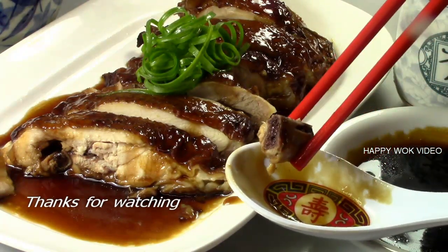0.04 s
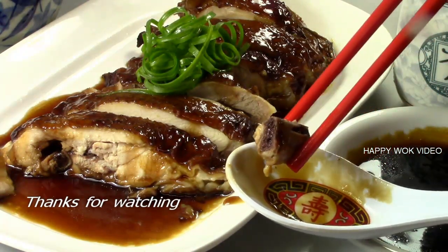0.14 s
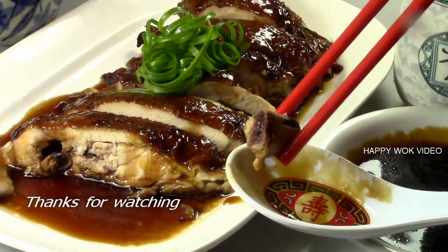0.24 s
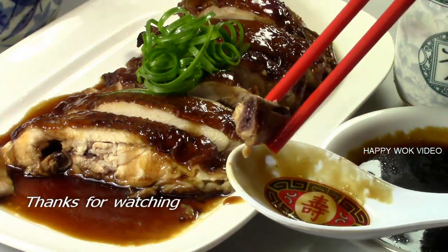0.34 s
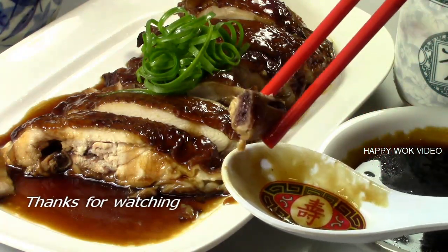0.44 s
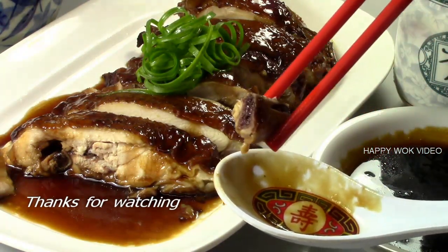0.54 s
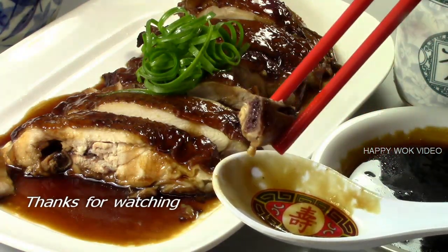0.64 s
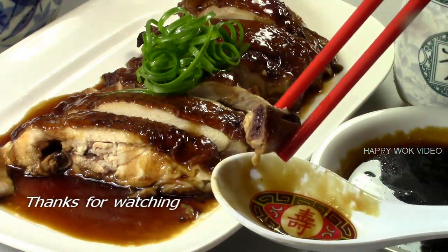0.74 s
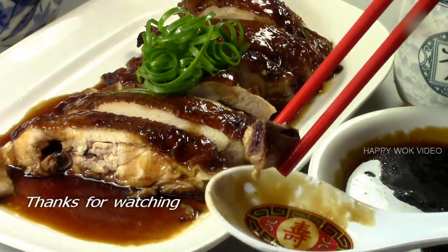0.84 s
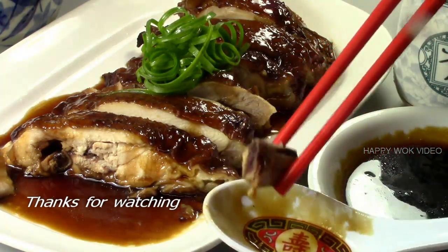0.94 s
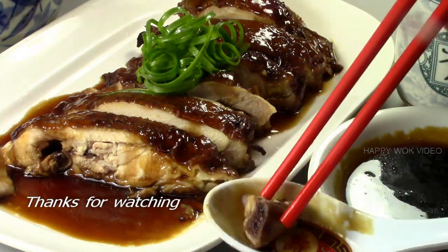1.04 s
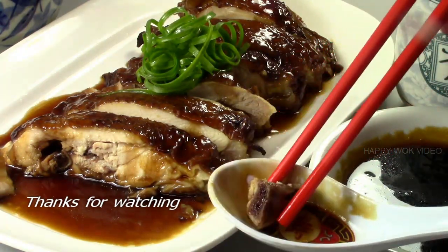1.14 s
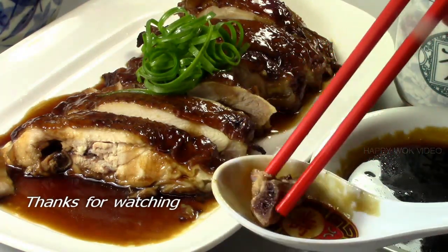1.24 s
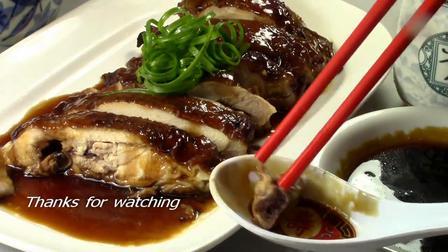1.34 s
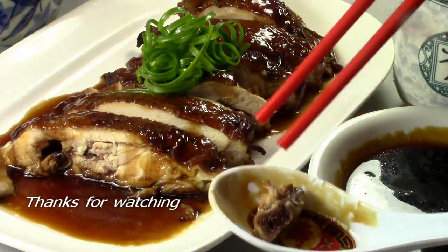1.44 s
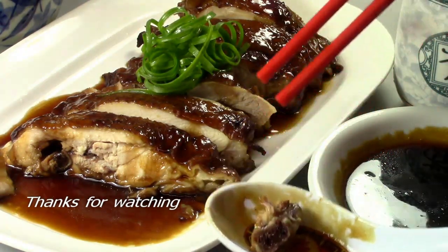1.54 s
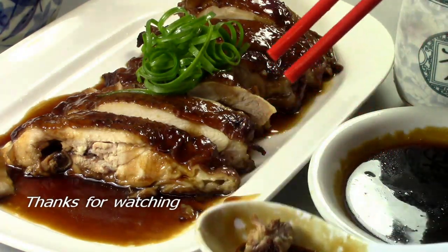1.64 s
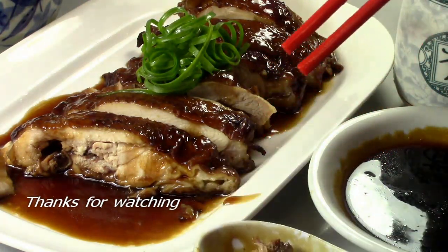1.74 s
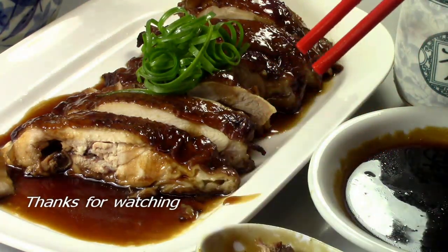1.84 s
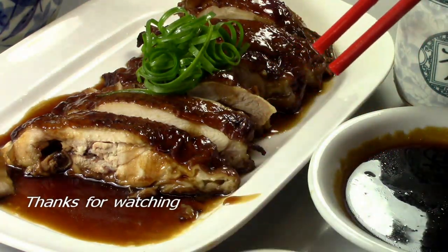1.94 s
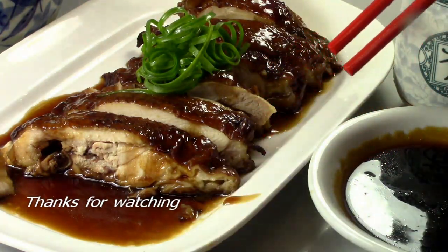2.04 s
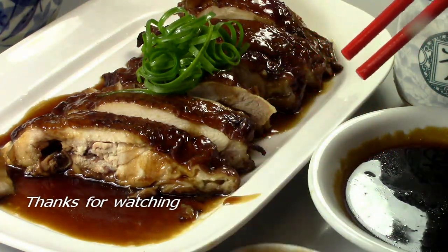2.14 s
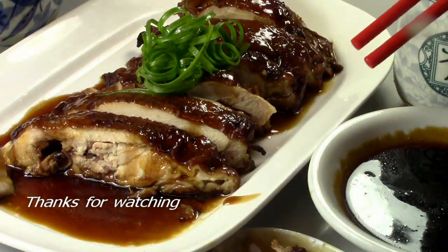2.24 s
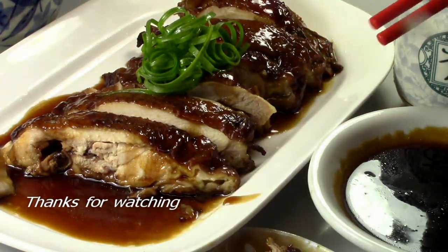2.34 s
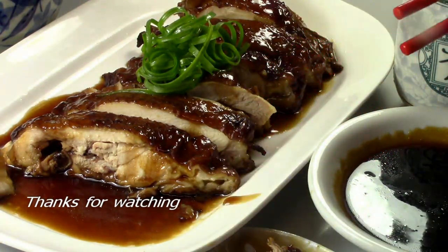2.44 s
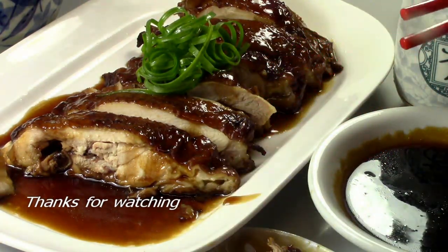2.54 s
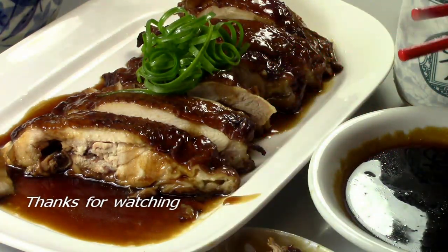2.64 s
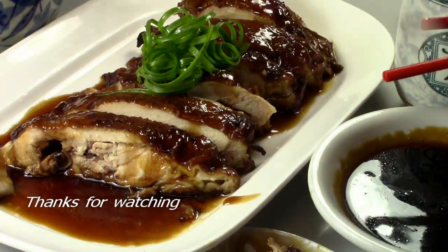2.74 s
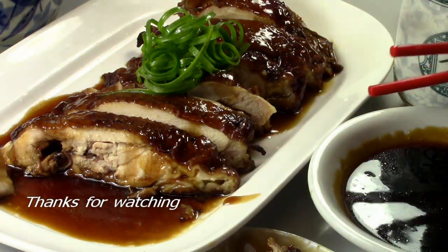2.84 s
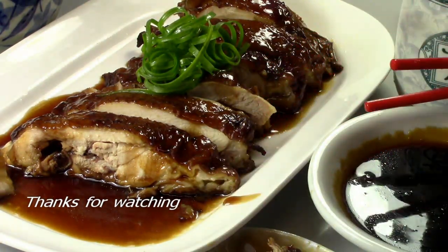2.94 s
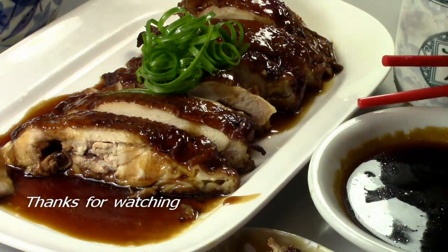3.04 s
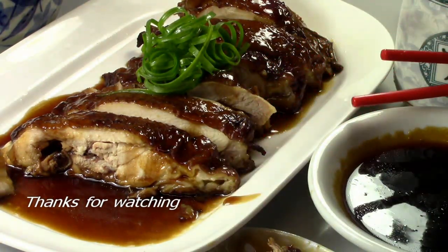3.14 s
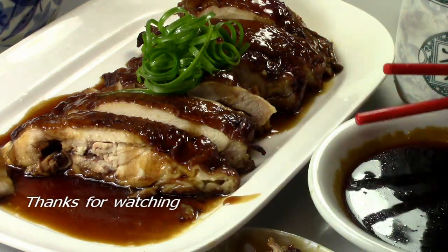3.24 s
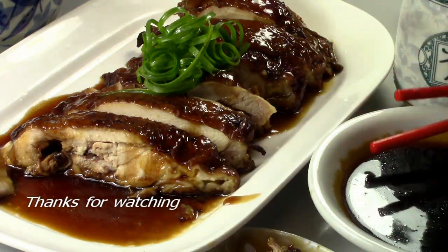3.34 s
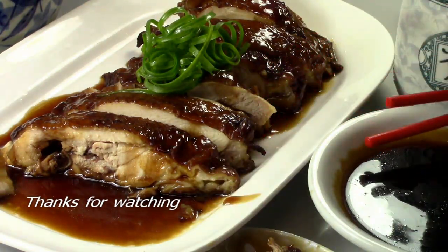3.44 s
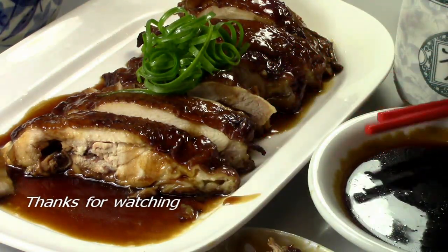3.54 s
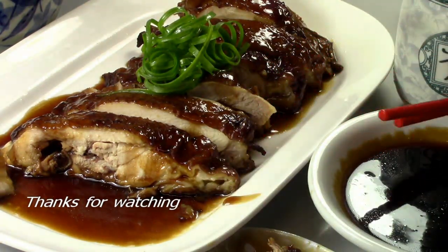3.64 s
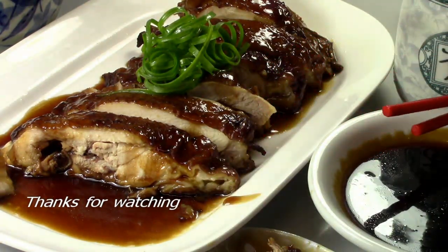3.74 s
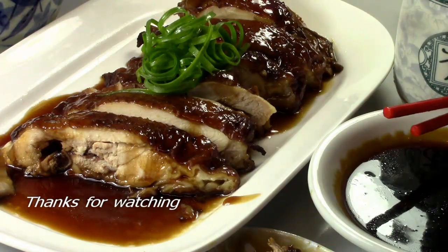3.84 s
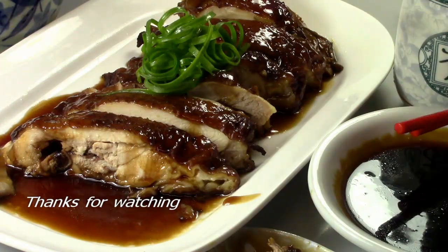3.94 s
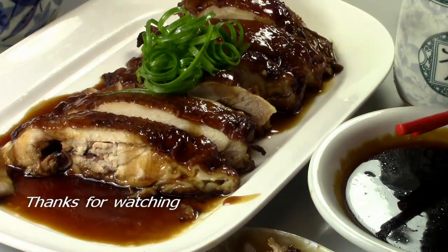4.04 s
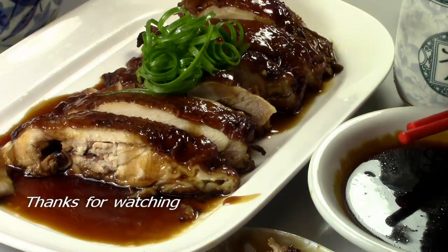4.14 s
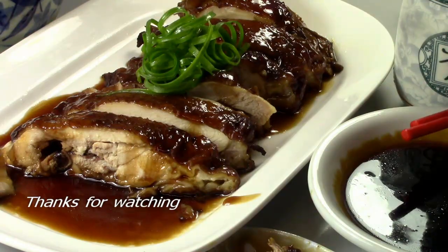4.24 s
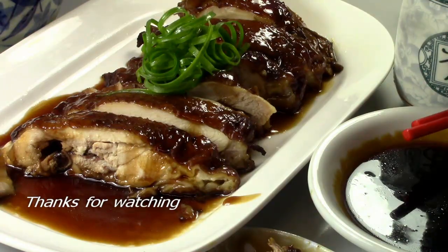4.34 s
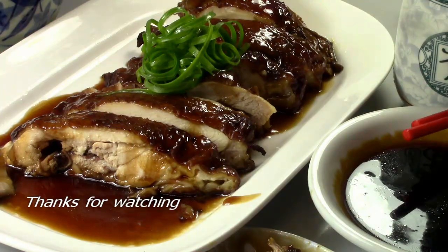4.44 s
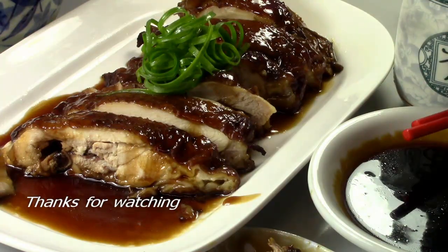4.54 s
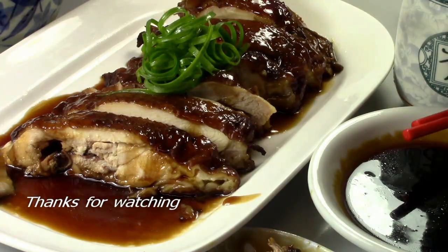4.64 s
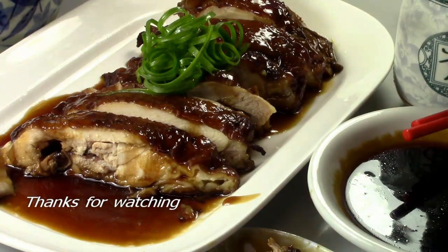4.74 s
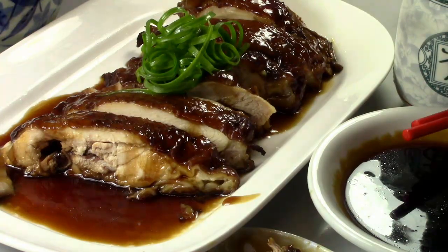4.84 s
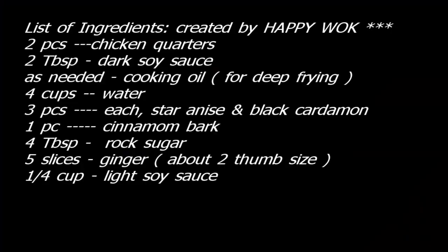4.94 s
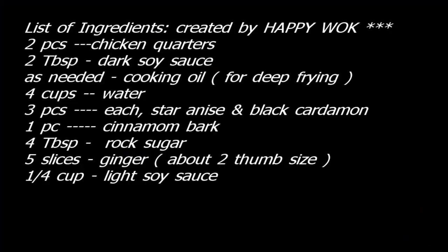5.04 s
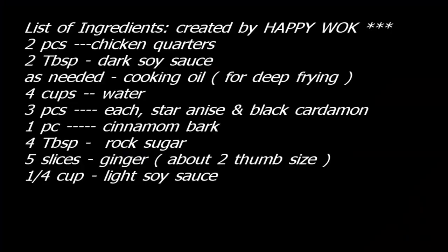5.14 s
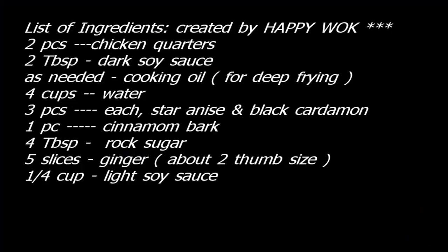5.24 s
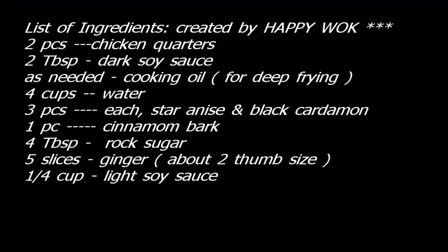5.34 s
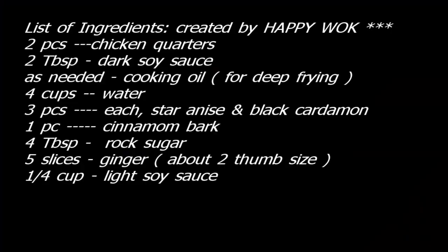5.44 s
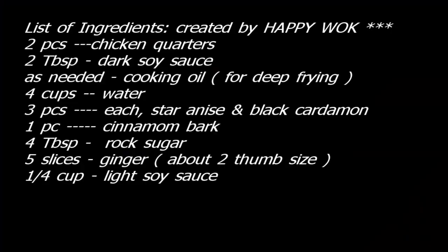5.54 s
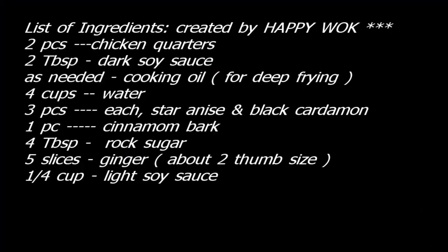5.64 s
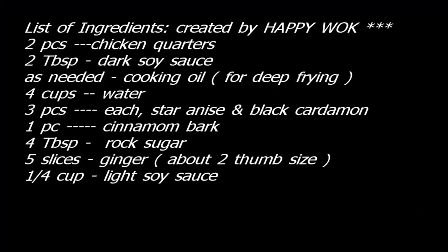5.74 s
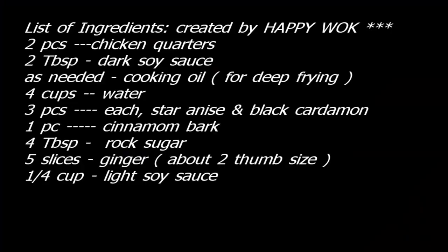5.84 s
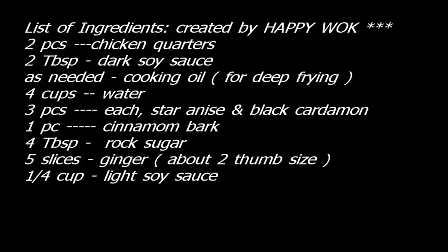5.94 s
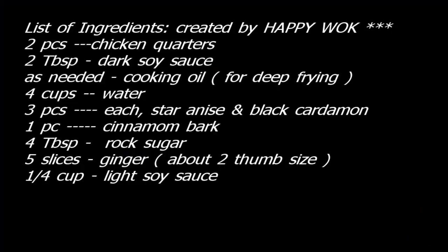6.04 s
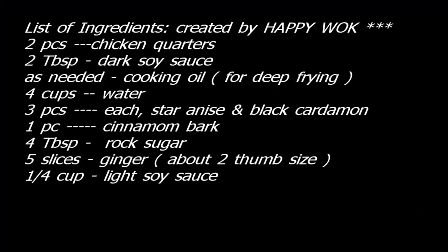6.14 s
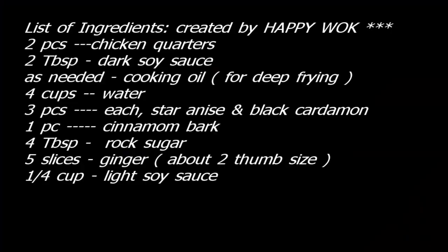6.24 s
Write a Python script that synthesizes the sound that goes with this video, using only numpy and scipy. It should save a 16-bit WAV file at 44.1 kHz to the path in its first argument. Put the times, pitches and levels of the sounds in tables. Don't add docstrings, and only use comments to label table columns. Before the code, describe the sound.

Stereo microphones sit near a table with ceramic dishes, slightly right of centre. Low room hum, thin hiss and faint rapid ticking continue beneath soft scrapes, dull knocks and light chopstick taps. A firm double knock comes early, then a pause, then a dense, sharp crockery clatter with short rings and buzzing. It thins to faint touches before a crisp crunch, quiet room tone and a dead stop.

```python
import sys
import numpy as np
from scipy import signal
from scipy.fft import rfft, irfft, next_fast_len
from scipy.io import wavfile

SR = 44100
rng = np.random.default_rng(int(sys.argv[2]) if len(sys.argv) > 2 else 0)


def transcribe(signal):
    frames = np.atleast_2d(signal).T
    limited = np.clip(frames, -1, 1)
    pcm = np.round(limited * 32767).astype(np.int16)
    wavfile.write(sys.argv[1], SR, pcm)


def invert_db(level):
    return 10 ** (np.asarray(level, dtype=float) / 20)


N = 276933

KNOCKS = [
    (1.5204, -20, 1170, 11),
    (1.540, -44, 1190, 6),
    (1.649, -54, 2270, 3.8),
    (1.9705, -42.5, 1150, 3.9),
    (2.1958, -6.5, 1600, 6.2),
    (2.204, -19.5, 2370, 7.9),
    (2.4462, -20.5, 2840, 17),
    (3.8591, -15, 1023, 3.5),
    (4.26, -15.5, 2230, 2.4),
    (4.7806, -41.5, 2870, 4.1),
]
TAPS = [(1.1839, -42.5, 1050, 15), (1.24, -33.5, 4600, 1.7), (2.3397, -17, 2580, 2.7),
        (2.465, -19.5, 1500, 5.1), (3.4911, -15.5, 2390, 9.1), (3.5024, -21.5, 2240, 2.1),
        (3.7282, -16.5, 1693, 14), (3.7584, -10, 3020, 2), (3.8344, -15, 1352, 1.9),
        (3.846, -17, 1155, 3.8), (4.2043, -29, 1348, 7), (4.2474, -13.5, 1267, 3.8), (4.4105, -39, 2500, 6)]
CLINKS = [(1.843, -24, 2950, 1.8), (2.026, -50, 2800, 14), (2.2012, -24.5, 1020, 2.3),
          (2.848, -36, 2750, 23), (3.069, -48.5, 1600, 8.6), (3.1709, -25, 2610, 8.8),
          (3.6208, -26.5, 1730, 4.8), (3.627, -14, 2840, 7), (3.6758, -13.5, 2380, 5.5),
          (3.799, -23, 2830, 5.3), (3.8238, -11, 1276, 4), (4.2192, -9.5, 2160, 13),
          (4.2355, -8, 3130, 3.5)]
# thud_re_crack_db, edge_re_crack_db
CRACK_KINDS = [
    (-14.5, -24.5),
    (-14.5, -7),
    (-12, 13.5),
]
USUAL_DB = -18.5
THUD_LAG = 0.58
THUD_HZ, THUD_WIDTH_HZ = 362, 180

# start_s, level_db, upper_modes_re_lower_db, chatter_ms
PLATE_HITS = [(1.5204, -56, -16, 1.4), (1.54, -48, -25, 2), (3.0689, -54, -1, 1), (3.491, -18.5, 1, 1),
              (3.624, -30, 3.5, 2.9), (3.675, -7.5, 0, 0.15), (3.7289, -28.5, 4.5, 2),
              (3.7594, -11, -2.5, 0.46), (3.799, -25.5, -7, 0.65), (3.8237, -7, -7.5, 1),
              (3.832, -11.5, -3.5, 4.9), (3.847, -16.5, 4.5, 2.4), (4.2053, -36.5, -9.5, 1),
              (4.2198, -5.5, -1, 0.27), (4.2355, -9.5, -4, .8), (4.249, -15, -7.5, 0.61)]
# start_s, level_db, upper_modes_re_lower_db, chatter_ms
BOWL_HITS = [
    (3.1702, -22, -4, 1.5),
    (3.627, -21.5, -13.5, 2.5),
    (3.655, -43.5, -9, 0.66),
    (3.695, -20.5, -14, 2.4),
    (3.74, -28, -9.5, 2.3),
    (3.80, -27, -9.5, 2.4),
    (3.85, -29, -12, 2.3),
    (3.875, -49.5, 1.5, 1),
    (4.374, -46, -5, 1),
    (4.411, -47.5, 4.5, 1),
]
# start_s, level_db, upper_modes_re_lower_db, chatter_ms
SPOON_HITS = [
    (1.8412, -30, -5.5, 1.5),
    (2.026, -49, 2, 1.9),
    (2.1964, -31.5, -14, 1.8),
    (2.4488, -31.5, -1.5, 0.36),
]
PLATE_HZ = [2205, 2255, 4290, 4765, 4800, 4824, 4850, 6190, 7660, 7780, 8170, 8273, 9215, 10770]
BOWL_HZ = [3280, 6160, 8258, 8656, 9222, 10070, 10830]
SPOON_HZ = [2719, 2850, 2993, 3150, 3601, 5700, 5879, 6100, 8581, 9981]
# level_db, t60_s
PLATE_MODES = [(-20, .08), (-22, .1), (-24, .03), (-9, .04), (-2, .07), (-10, .22), (-13, .08), (-20, .04),
               (-12, .04), (-17, .04), (-2, .08), (-13, .07), (-17, .04), (-24, .05)]
BOWL_MODES = [(-6, .38), (-24, .2), (-28, .2), (-11, .3), (-25, .15), (-33, .2), (-31, .2)]
SPOON_MODES = [(0, .09), (-9, .05), (-4, .12), (-8, .04), (-8, .15), (-16, .06), (-14, .12), (-18, .06),
               (-16, .07), (-28, .1)]
# start_s, level_db, pitch_hz, t60_s
SINGLE_NOTES = [(1.2384, -28, 6660, 0.0033), (2.8493, -24.5, 7550, 0.02), (3.7282, -23, 6300, 0.051),
                (3.8233, -16, 6260, 0.02), (4.4093, -46, 6340, 0.02), (2.030, -58.5, 3580, 0.17),
                (2.448, -15.5, 2830, 0.028), (2.448, -26.5, 7000, 0.01), (2.8493, -27, 9300, 0.014),
                (2.8506, -37, 3680, 0.026), (3.069, -51.5, 6160, 0.046), (3.1725, -36.5, 410, 0.038),
                (3.1712, -32.5, 5300, 0.019), (3.1705, -24, 9220, 0.025), (3.4922, -26, 8600, 0.026),
                (3.6293, -23, 9400, 0.017), (3.6293, -26.5, 8100, 0.014), (3.4912, -21, 6280, 0.022),
                (1.5206, -45, 4805, .35), (1.5206, -38, 2220, .2), (1.8403, -30, 5880, 0.028),
                (4.262, -36, 4860, .3), (4.2353, -21, 5100, 0.058), (1.8406, -14.5, 2910, 0.02),
                (2.3391, -23, 4950, 0.018), (2.3394, -35.5, 7920, .02), (4.2191, -23, 406.4, .07),
                (3.976, -47, 8220, 0.077), (4.013, -42.5, 8100, 0.06)]

# peak_s, level_db
CRUNCH_SNAPS = [
    (4.806, -27),
    (4.828, -18),
    (4.855, -7.5),
    (4.889, -15),
    (4.988, -32.5),
]
# pitch_hz, level_db_per_hz
CRUNCH_COLOUR = [(24, -55), (40, -13), (239, -3.5), (302, -10), (583, -2.5), (890, -5.5), (1050, -1),
                 (1560, 0), (1980, 7), (2690, 7.5), (6260, 5.5), (11000, -2.5), (14300, -46), (22000, -120)]
SNAP_RISE_DB_S, SNAP_FALL_DB_S, CRACKS_PER_S = 1301.5, 400, 4000
CRUMBS_FROM_S, CRUMBS_DB, CRUMBS_FADE_DB_S = 4.8, -44, 22

# peak_s, level_db, rise_s, fall_s
DRAG_PULLS = [
    (.5, -47, 0.017, 0.09),
    (0.639, -42, 0.11, 0.032),
    (.764, -55, 0.044, 0.025),
    (.87, -52.5, .025, 0.086),
    (.925, -48, 0.077, 0.017),
    (.984, -51, 0.077, 0.045),
    (1.216, -54.5, 0.047, 0.011),
    (4.024, -49.5, 0.063, 0.063),
    (4.2, -50.5, 0.027, .002),
]
# pitch_hz, width_hz, level_db
TABLE_PEAKS = [(427, 82, 3.5), (620, 95, -4), (1190, 350, 4), (1480, 370, -1), (2260, 230, -7)]

# peak_s, level_db, rise_s, fall_s, colour_hz
RUSTLE_STROKES = [
    (.08, -65, 0.085, 0.028, 5230),
    (.212, -59, 0.36, 0.35, 5270),
    (2.332, -41, 0.051, 0.0074, 9820),
    (2.36, -52, .003, 0.1, 6800),
    (3.33, -55, .15, 0.46, 4984),
    (3.464, -50.5, 0.096, 0.047, 5100),
    (3.52, -41.5, .003, 0.15, 5260),
    (4.02, -43, 0.025, 0.032, 3300),
    (4.6, -64.5, 0.35, 0.65, 4530),
]
RUSTLE_WIDTH = .3
STROKE_DEPTH_DB = 17.5
# peak_s, level_db, rise_s, fall_s
CHATTER = [
    (3.69, -22.5, .003, 0.17),
    (3.76, -23, .006, 0.017),
    (3.82, -31, 0.038, .002),
    (3.848, -24, 0.036, 0.03),
]
# start_s, end_s, pitch_hz, level_db
SQUEAKS = [
    (.03, .06, 3400, -70),
    (.05, .10, 3650, -69),
    (.11, .23, 2850, -67),
    (.04, .16, 7000, -70),
    (2.03, 2.075, 2800, -60),
]

# pitch_hz, t60_s
ROOM_T60 = [(200, .35), (1000, 0.25), (3000, 0.24), (6000, .24), (11000, 0.11)]
# pitch_hz, level_db
SIDE_COLOUR = [(100, -22), (500, -24), (2000, -20), (5000, -17), (11000, -18)]
ROOM_DB, RING_SEND_DB = -8, -7.5
LEAN_DB = -0.5

# start_s, level_db
AIR_LEVEL = [(0, -54), (.4, -57), (1.1, -58), (2, -56.5), (2.7, -59), (3.3, -56), (4.1, -57.5), (5.19, -56)]
# pitch_hz, level_db_per_hz
AIR_COLOUR = [(15, -63), (25, -35.5), (53, -28), (109, -7.5), (200, -10), (239, -1), (278, -8.5), (461, -8),
              (1090, -13.5), (2460, -16.5), (3250, -16.5), (5680, -21.5), (10700, -27.5), (13900, -62),
              (22000, -120)]
AIR_SIDE_DB = -11.5
HISS_DB, HISS_FOLLOWS = -63, .9
WHINE_HZ, WHINE_DB = 5600, -79
TICK_FIRST_S, TICKS_PER_S = .052, 15
TICK_HZ, TICK_WIDTH_HZ, TICK_DB, TICK_S = 2300, 400, -59, .008

# blow_s, lowest_lost_hz
DROPOUTS = [
    (1.841, 7000),
    (2.195, 1000),
    (2.339, 2500),
    (2.447, 1500),
    (3.674, 1200),
]
DROPOUT_S, DROPOUT_LEAD_S, DROPOUT_LEFT = .008, .003, .1
# start_s, value
OFFSET = [(5.1865, 0), (5.1872, .0078), (5.5, .0084), (6.04, .0083), (6.056, .00696), (6.28, .00696)]
CUT_S, CUTOFF_HZ = 5.187, 11200


def at_hz(points, hz):
    table = np.array(points)
    return np.interp(np.log(hz), np.log(table[:, 0]), table[:, 1])


def in_time(rows, outside=None):
    s, *columns = np.transpose(rows)
    return [np.interp(np.arange(N) / SR, s, c, outside, outside) for c in columns]


def rms_one(x):
    return x / np.sqrt(np.mean(x ** 2) + 1e-20)


def coloured(x, spectrum):
    size = next_fast_len(N)
    hz = np.arange(size // 2 + 1) * SR / size + 1
    shaped = irfft(rfft(x, size) * invert_db(at_hz(spectrum, hz)), size)
    return rms_one(shaped[..., :N])


def band(x, low_hz, high_hz):
    return signal.sosfilt(signal.butter(2, [low_hz, high_hz], "band", fs=SR, output="sos"), x)


def resonance(x, hz, width_hz):
    r = np.exp(-np.pi * width_hz / SR)
    poles = [1, -2 * r * np.cos(2 * np.pi * hz / SR), r * r]
    return signal.lfilter([(1 - r * r) / 2, 0, (r * r - 1) / 2], poles, x)


def double_resonance(x, hz, width_hz):
    return resonance(resonance(x, hz, width_hz), hz, width_hz)


def ring(clicks, hz, t60):
    r, w = invert_db(-60 / (t60 * SR)), 2 * np.pi * hz / SR
    return signal.lfilter([0, np.sin(w)], [1, -2 * r * np.cos(w), r * r], clicks + 1e-18)


def grains(per_s, spread_db):
    sizes = invert_db(spread_db * np.minimum(rng.exponential(1, N), 4)) * rng.choice([-1, 1], N)
    return sizes * (rng.random(N) < per_s / SR)


def burst(ms, size=2048):
    envelope = np.exp(-np.arange(size) / SR * 1000 / np.clip(ms, .1, 15))
    spectrum = rfft(rng.standard_normal(size) * envelope)
    even = irfft(spectrum / np.abs(spectrum), size) * np.sqrt(envelope)
    return even / np.sqrt(np.sum(even ** 2))


def stroke(s, db, rise_s, fall_s):
    t = np.arange(N) / SR - s
    away = np.maximum(-t / max(rise_s, .001), t / max(fall_s, .001))
    return invert_db(db - STROKE_DEPTH_DB * away) * (away < 2)


def contacts():
    body, edge = np.zeros((2, N))
    for rows, (thud_db, edge_db) in zip([KNOCKS, TAPS, CLINKS], CRACK_KINDS):
        for s, db, hz, ms in rows:
            blow = burst(ms)
            push = burst(3.8 * ms + 3)
            span = slice(int(s * SR), int(s * SR) + len(blow))
            middle = band(band(blow, 600, 6200), 840, 3700) + 1.99 * resonance(blow, hz, 330)
            thud = band(push, 130, 690) + 0.66 * band(push, 30, 100)
            thud = thud + 1.2 * resonance(push, THUD_HZ, THUD_WIDTH_HZ)
            thud_gain = invert_db(thud_db - THUD_LAG * max(db - USUAL_DB, 0) + 14.0)
            body[span] += invert_db(db + 18.5) * (middle + thud_gain * thud)
            edge[span] += invert_db(db + edge_db + 11) * band(blow, 3800, 9600)
    return body, edge


def struck(hits, pitches, modes, split_hz, damp_db):
    out = np.zeros((2, N + SR // 2))
    t = np.arange(SR // 2) / SR
    hz = np.array(pitches)[:, None]
    mode_db, t60 = np.transpose(modes)[:, :, None]
    apart = .14 * rng.standard_normal((len(pitches), 1))
    next_starts = [row[0] for row in hits[1:]] + [N / SR]
    for (s, db, upper_db, ms), next_s in zip(hits, next_starts):
        swell = 1 - np.exp(-t * 1000 / max(ms, .1))
        mode_level_db = db + mode_db + (hz > split_hz) * upper_db
        level = swell * invert_db(mode_level_db - 60 * t / t60 + damp_db * (t > next_s - s))
        phase = 2 * np.pi * (hz * t + rng.random((len(pitches), 1)))
        pair = [(level * np.sin(phase + side * apart)).sum(axis=0) for side in (1, -1)]
        out[:, int(s * SR):int(s * SR) + len(t)] += pair
    return out[:, :N]


def single_notes():
    out = np.zeros(N)
    for s, db, hz, t60 in SINGLE_NOTES:
        note = ring(np.arange(8192) == 0, hz, t60)
        out[int(s * SR):int(s * SR) + len(note)] += invert_db(db) * note
    return out


def crunch():
    t = np.arange(N) / SR
    level = invert_db(CRUMBS_DB - CRUMBS_FADE_DB_S * (t - CRUMBS_FROM_S)) * (t > CRUMBS_FROM_S)
    for s, db in CRUNCH_SNAPS:
        drop_db = np.maximum((s - t) * SNAP_RISE_DB_S, (t - s) * SNAP_FALL_DB_S)
        level = np.maximum(level, invert_db(db - drop_db))
    clumps = band(rng.standard_normal(N), 6.86, 100)
    snaps = grains(CRACKS_PER_S, 4.05) * invert_db(1.0 * rms_one(clumps))
    return level * invert_db(-9.5) * coloured(snaps, CRUNCH_COLOUR)


def drag():
    level = sum(stroke(*row) for row in DRAG_PULLS)
    slips = rms_one(grains(3000, 2.5))
    body = sum(invert_db(db) * double_resonance(slips, hz, width_hz) / np.sqrt(width_hz)
               for hz, width_hz, db in TABLE_PEAKS)
    scrape = rms_one(body) + invert_db(-7.0) * band(slips, 250, 4600)
    return level * slips, level * scrape


def singing(slips):
    return sum(invert_db(db) * ring(slips, hz, t60) for hz, (db, t60) in zip(PLATE_HZ, PLATE_MODES))


def rustle():
    fine = rms_one(grains(6700, 2.9))
    brushed = sum(stroke(s, db - 4, rise, fall) * rms_one(resonance(fine, hz, RUSTLE_WIDTH * hz))
                  for s, db, rise, fall, hz in RUSTLE_STROKES)
    buzz_level = sum(stroke(*row) for row in CHATTER)
    return brushed + buzz_level * invert_db(-3.5) * rms_one(band(fine, 1500, 14000))


def squeaks():
    t, white = np.arange(N) / SR, rng.standard_normal(N)
    out = np.zeros(N)
    for start, end, hz, db in SQUEAKS:
        swell = np.sin(np.pi * np.clip((t - start) / (end - start), 0, 1))
        out += invert_db(db) * swell * rms_one(resonance(resonance(white, hz, 88.4), hz, 89))
    return out


def room(x):
    t = np.arange(SR // 2) / SR
    white = rng.standard_normal((2, 2, len(t)))
    tail = 0
    for k, low_hz in enumerate(100 * 2 ** np.arange(0, 7, .5)):
        decay = invert_db(-60 * t / at_hz(ROOM_T60, low_hz))
        mid_side = [[1], [invert_db(at_hz(SIDE_COLOUR, low_hz))]]
        tail = tail + band(white[k % 2], low_hz, low_hz * 2 ** .5) * decay * mid_side
    tail = tail * np.clip((t - .002) / 0.00043, 0, 1)
    tail = tail / np.sqrt(np.sum(tail[0] ** 2))
    mid, side = signal.fftconvolve(x[None], tail, axes=1)[:, :N]
    return mid + side * [[1], [-1]]


def air():
    low_db, = in_time(AIR_LEVEL)
    noise = coloured(rng.standard_normal((2, N)), AIR_COLOUR)
    low = signal.sosfilt(signal.butter(2, 2000, fs=SR, output="sos"), noise)
    high = noise - low
    flicker = invert_db(1.4 * rms_one(band(rng.standard_normal(N), 2.4, 27)))
    hum = invert_db(low_db - 1.5) * flicker * rms_one(low)
    hiss = invert_db(HISS_DB + HISS_FOLLOWS * (low_db + 57.5)) * rms_one(high)
    mid, side = hum + hiss
    whine = rms_one(double_resonance(rng.standard_normal(N), WHINE_HZ, 40))
    return mid + invert_db(WHINE_DB) * whine + invert_db(AIR_SIDE_DB) * side * [[1], [-1]]


def ticking():
    since = (np.arange(N) / SR - TICK_FIRST_S) % (1 / TICKS_PER_S)
    note = rms_one(double_resonance(rng.standard_normal(N), TICK_HZ, TICK_WIDTH_HZ))
    return invert_db(TICK_DB) * note * np.exp(-since / TICK_S)


def dropouts(x):
    t, out = np.arange(N) / SR, x.copy()
    for s, hz in DROPOUTS:
        at = slice(int((s - .03) * SR), int(s * SR))
        low = signal.sosfiltfilt(signal.butter(4, hz, fs=SR, output="sos"), x[:, at])
        from_middle = np.abs(t[at] - s + DROPOUT_LEAD_S + DROPOUT_S / 2)
        gate = np.clip(2 - 4 * from_middle / DROPOUT_S * .75, 0, 1)
        out[:, at] -= (1 - DROPOUT_LEFT) * gate * (x[:, at] - low)
    return out


def scene():
    body, edge = contacts()
    slips, dragged = drag()
    plate = struck(PLATE_HITS, PLATE_HZ, PLATE_MODES, split_hz=5500, damp_db=-4.5)
    plate = plate + invert_db(-41.0) * singing(slips)
    bowl = struck(BOWL_HITS, BOWL_HZ, BOWL_MODES, split_hz=4500, damp_db=-8.5)
    spoon = struck(SPOON_HITS, SPOON_HZ, SPOON_MODES, split_hz=4500, damp_db=-4.5)
    right = edge + single_notes() + rustle()
    centre = body + dragged + squeaks() + crunch()
    near = (plate + bowl + right) * invert_db([[LEAN_DB], [-LEAN_DB]])
    near = near + (centre + spoon) * invert_db([[-.25], [.25]])
    sent = right + centre + invert_db(RING_SEND_DB) * (plate + bowl + spoon).mean(axis=0)
    reflected = invert_db(ROOM_DB) * room(sent) * invert_db([[-.3], [.3]])
    return near + reflected + air() + ticking()


def band_limit(x):
    return signal.sosfilt(signal.butter(12, 11980, fs=SR, output="sos"), x)


def record(dry):
    rounded = 1.7 * np.tanh(dropouts(dry) / 1.7)
    x = signal.sosfilt(signal.cheby2(20, 50, CUTOFF_HZ, fs=SR, output="sos"), rounded)
    x = x * (np.arange(N) < CUT_S * SR) + in_time(OFFSET)[0]
    return band_limit(np.clip(x, -1, 1))


dry = scene()
out = record(dry)
transcribe(out)
```